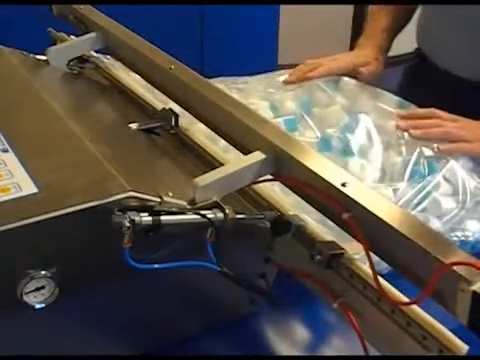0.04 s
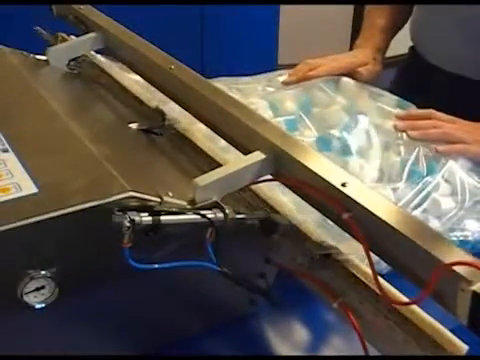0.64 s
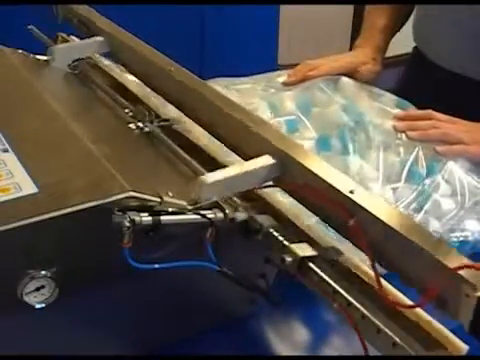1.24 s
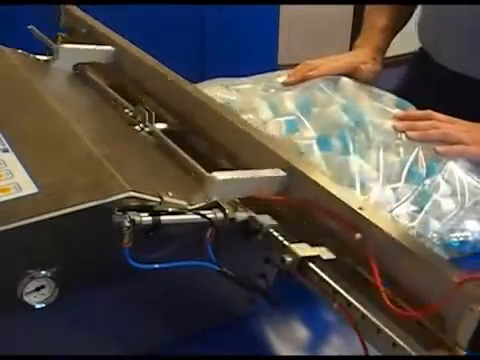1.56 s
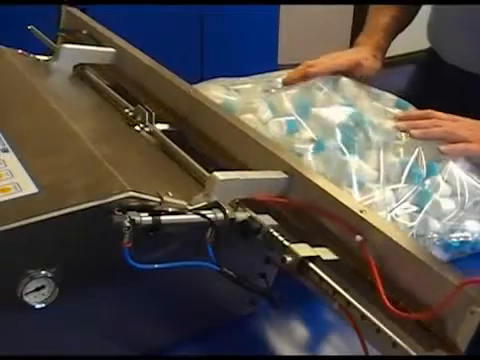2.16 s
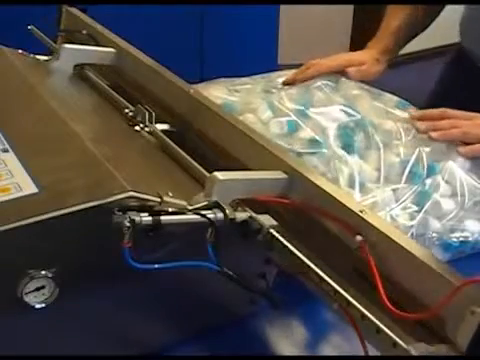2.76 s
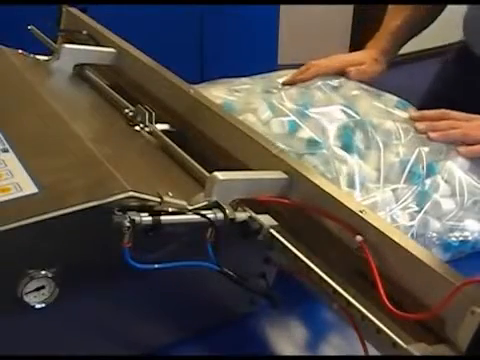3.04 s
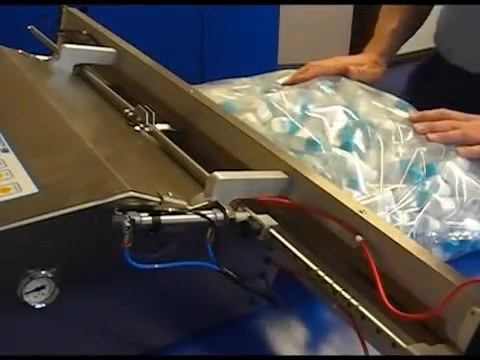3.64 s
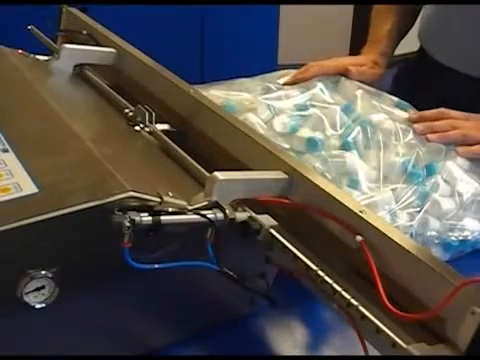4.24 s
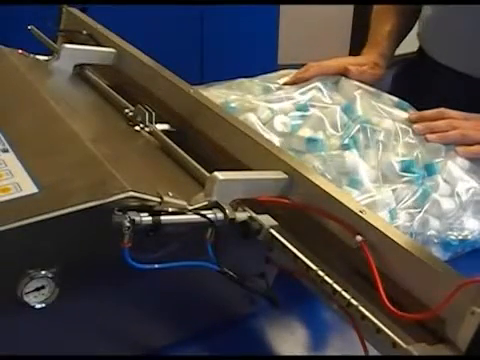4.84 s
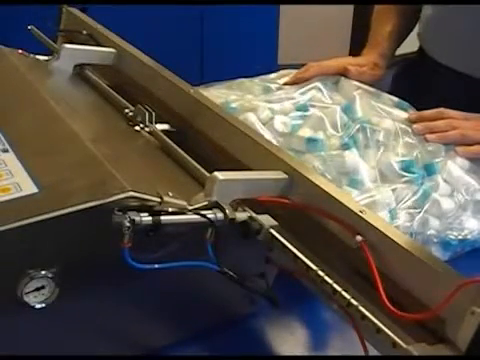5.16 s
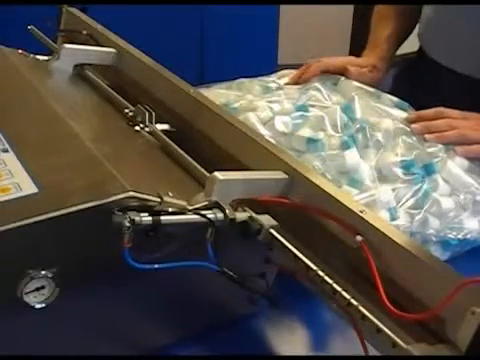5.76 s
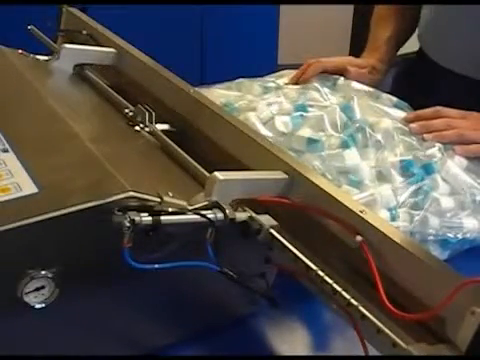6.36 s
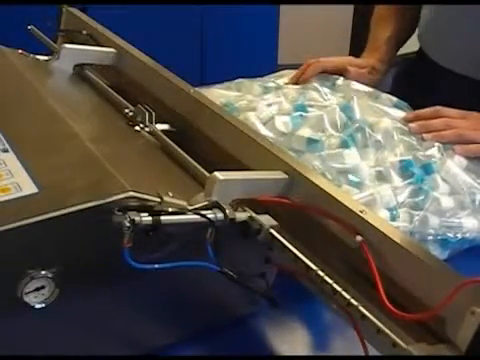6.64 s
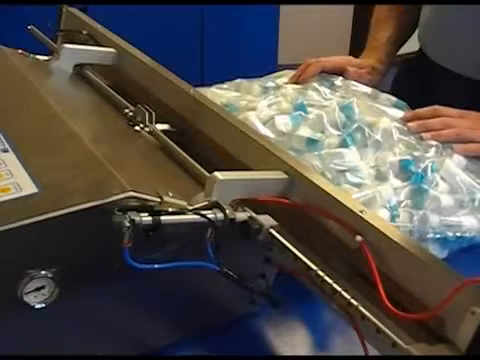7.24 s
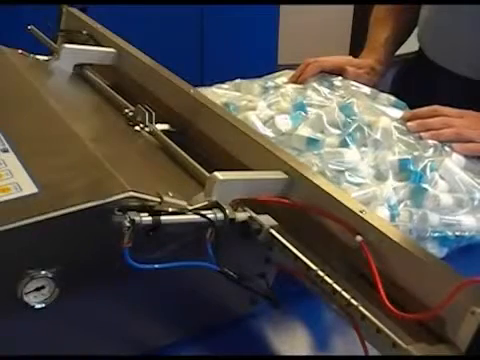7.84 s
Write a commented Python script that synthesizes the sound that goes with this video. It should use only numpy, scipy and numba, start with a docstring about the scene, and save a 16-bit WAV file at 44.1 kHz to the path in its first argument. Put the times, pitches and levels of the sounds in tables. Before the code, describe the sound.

Metal clacks and a short pneumatic hiss give way to a vacuum sealer's loud, even suction, interrupted once by a sharp valve click.

```python
"""A pneumatic vacuum sealer in a quiet workshop. Plastic film ticks, a port starts to leak, a latch snaps.
The carriage rumbles and the jaw drops on the bag, exciting the modes of the steel frame; a cylinder
exhausts with a hiss and thin whistles. At 1.9 s a valve opens and turbulent suction rushes steadily
through the resonant steel housing. A second later the valve snaps over; near 4.7 s a low hum swells and
fades. Throughout, a limiter ducks after the sharpest clacks and creeps back."""
import sys
import numpy as np
from scipy import signal
from scipy.fft import rfft, irfft, next_fast_len
from scipy.io import wavfile
from scipy.ndimage import uniform_filter1d, map_coordinates
from numba import njit

SR = 44100
rng = np.random.default_rng(int(sys.argv[2]) if len(sys.argv) > 2 else 0)


def generate_wav(sig):
    """Save sig (samples, or channels by samples) to the path in sys.argv[1] as 16-bit PCM at SR."""
    pcm = np.round(np.clip(np.atleast_2d(sig).T, -1, 1) * 32767).astype(np.int16)
    wavfile.write(sys.argv[1], SR, pcm)


N = 347949
T = np.arange(N) / SR

# background spectrum of the workshop: (frequency [Hz], level [dB])
WORKSHOP_SPECTRUM = [(25, -1), (60, 1), (100, 0), (200, 0.5), (300, -2.5), (400, -4), (500, -11),
                     (1000, -11), (1500, -20), (4000, -19), (15000, -29)]
# ticks of film and guides: (time [s], level [dB], centre [Hz], sharpness [Q], cover's relative level [dB])
FILM_TICKS = [(0.008, -53.5, 1060, 2.2, -17), (0.0607, -50.5, 2200, .9, -12),
              (0.075, -63.5, 4600, 1.2, -17), (0.7435, -47.5, 1000, 2.4, -19), (0.743, -52, 5460, 3.1, -21),
              (0.743, -55, 2700, 2.4, -17), (0.918, -49, 2096, 0.38, -16), (1.0075, -49.5, 5700, 1, -22),
              (1.473, -58, 2200, .6, -17), (1.620, -55, 1200, 2, -13), (1.658, -56, 2700, 4, -22),
              (1.697, -47.5, 5334, 1.5, -15.5), (1.742, -59, 4400, 0.96, -16), (1.750, -46, 4600, 4, -24),
              (1.767, -49, 2600, 1.2, -17), (2.779, -36.8, 5600, 0.6, -11), (5.087, -47.5, 5300, 1.8, -21)]
# ringing guide, frame, clamp, jaw and end stop: (time [s], frequency [Hz], level [dB], t60 [s], drive [s])
STEEL_RINGS = [(0.056, 1017, -68.5, 0.27, .001), (.182, 398, -50, .19, 0.0051),
               (0.158, 250, -37, .026, .003), (1.042, 1880, -59, .08, .002),
               (1.042, 410, -41.5, 0.065, 0.005), (1.134, 1725, -39.5, 0.032, .007),
               (1.138, 2880, -48, .064, .001), (1.134, 675, -46, 0.15, .004),
               (1.134, 535, -51, 0.097, .004), (1.898, 410, -39, 0.085, 0.02),
               (1.897, 303, -44, 0.16, 0.003)]
# spectrum of air forced through a narrow port: (frequency [Hz], level [dB])
HISS_SPECTRUM = [(300, -3), (1000, -8), (1600, 1.5), (2600, 1), (3900, -4), (5400, 2.5), (7400, 0),
                 (9000, -9), (11500, -12), (15000, -19)]
# resonances of the port that leaks while the jaw closes: (frequency [Hz], width [Hz], gain [dB])
LEAK_RESONANCES = [(2320, 190, 11), (4860, 470, 8.5), (5600, 280, 9.5), (6700, 500, -3), (1100, 700, -2),
                   (7500, 650, 6.5)]
# metal striking metal: (time [s], level [dB], tilt [dB/octave], contact time [s], t60 [s])
METAL_CLACKS = [(0.1562, -42, 1.9, 0.009, 0.052), (1.041, -60, -10, .004, .07),
                (1.116, -54, -7, 0.008, 0.04), (1.124, -53, 0, 0.01, 0.05),
                (1.134, -45.5, -3, 0.011, 0.075), (1.889, -53, -0.5, 0.011, 0.049),
                (1.899, -44.5, -2, 0.0039, 0.092), (2.8925, -26.3, -0.9, 0.0019, 0.034)]
# spectrum of a clack before its tilt: (frequency [Hz], level [dB])
CLACK_SPECTRUM = [(60, -45), (200, -25), (550, 1), (1100, -0.5), (2800, -2.5), (4000, -10), (5800, -.5),
                  (10000, -4.5), (12000, -6), (15000, -20.5)]
# mode clusters of the latch spring: (centre [Hz], sharpness [Q], level [dB], t60 [s])
SPRING_CLUSTERS = [(6480, 24, -33.5, .025), (6430, 38, -52, .28), (6050, 7, -61, .22)]
# blows on the steel frame: (time [s], level [dB], spectral centre [Hz], decay time scale [ratio])
FRAME_BLOWS = [(0.181, -52, 190, 0.55), (0.619, -72, 620, 1.4), (1.041, -49, 400, 1.1),
               (1.060, -50.5, 115, 1.6), (1.133, -42.3, 165, 0.75), (1.575, -69, 200, .6),
               (1.783, -57.5, 210, 0.58), (1.828, -61, 190, 0.5), (1.897, -41.5, 560, 0.25),
               (2.801, -63, 85, 1.3), (2.901, -43, 520, 0.6), (2.941, -53, 85, 0.61)]
# modes of the frame, before a blow weights and scales them: (frequency [Hz], level [dB], t60 [s])
FRAME_MODES = [(93.5, -13, 0.58), (140, -12, .4), (181, -1.5, 0.22), (196, 1, 0.31), (262.7, -2, .28),
               (315.6, -1, 0.33), (401.6, -3.5, 0.39), (550, -22, 0.18), (682, -9, 0.21), (994, 3, 0.11)]
# strokes of the carriage: (start [s], duration [s], level [dB])
CARRIAGE_STROKES = [(0.5, 0.55, -83), (1.094, 0.085, -59), (1.557, 0.43, -71)]
# spectrum of the moving carriage: (frequency [Hz], level [dB])
RUMBLE_SPECTRUM = [(40, -31), (90, 2), (170, 2), (280, -22), (400, -1.5), (520, -31), (1200, -20),
                   (3000, -36)]
# resonances of the cylinder's exhaust port: (frequency [Hz], width [Hz], gain [dB])
EXHAUST_RESONANCES = [(1720, 55, 7), (1980, 55, 11), (2120, 50, 5), (2280, 150, -7), (2450, 70, 6),
                      (2680, 90, 10), (3180, 110, 11), (4290, 90, 7), (4530, 110, 9), (4930, 100, 10.5),
                      (5420, 240, 7.5), (5750, 120, -1), (6020, 130, 3), (6250, 150, -3), (6560, 110, 5),
                      (6900, 110, 4), (7130, 140, 5), (7640, 130, 6), (8700, 200, 3), (10100, 300, 4),
                      (10800, 300, 4)]
# whistles of the exhaust: (start [s], stop [s], starting pitch [Hz], level [dB])
EXHAUST_WHISTLES = [(1.176, 1.417, 5730, -72), (1.211, 1.45, 6630, -74), (1.461, 1.69, 5380, -69.5)]
# spectrum of the suction jet: (frequency [Hz], level [dB])
JET_SPECTRUM = [(50, -42), (90, -29), (140, -20.6), (270, -9.6), (520, -9), (820, -.6), (1170, -.5),
                (1350, -6), (1850, -8.3), (2700, -3.4), (3750, -20.7), (6500, -23.6), (10500, -26.3),
                (15000, -32)]
# resonances and antiresonances of the housing: (frequency [Hz], width [Hz], gain [dB])
HOUSING_RESONANCES = [(208, 14, 2), (233, 16, -4.5), (302, 17, 5.5), (377, 21, -3.5), (406, 40, 5.3),
                      (538, 16, 3), (613, 30, 3.5), (681, 15, 3.5), (711, 19, -4.5), (752, 25, -9.5),
                      (946, 20, 3), (1014, 34, -3.5), (1070, 27, 7.5), (1107, 10, -3), (1168, 14, -3),
                      (1204, 46, 4.5), (1231, 22, 8.2), (1316, 26, -3), (1391, 30, -3), (1434, 30, 6.8),
                      (1489, 16, -5), (1572, 30, 6.2), (1618, 18, -6.5), (1655, 36, 5.5), (1715, 30, -3),
                      (1995, 70, 4), (2057, 21, -2.5), (2180, 58, -4.5), (2238, 30, 5.3), (2291, 24, -5.5),
                      (2385, 30, 1.5), (2606, 50, -5), (2720, 90, .7), (2809, 34, -3.5), (2904, 38, -4.5),
                      (2963, 76, -5), (3171, 30, 3.8), (3389, 36, 4), (4375, 70, 5.3), (5110, 180, 5.3),
                      (5470, 120, 2.2), (6000, 140, 2), (7710, 160, 2.5), (8230, 180, 2.5),
                      (8700, 150, 2.2), (10130, 140, 3), (10770, 400, 2.5), (12100, 900, -2.6)]
# modes of the suction valve's body: (frequency [Hz], level [dB], t60 [s])
VALVE_MODES = [(1420, -32, .08), (2240, -23, .04), (3050, -27, .025), (4390, -39, .075), (5080, -35, .03),
               (7300, -31, .03), (9020, -37, .03), (10000, -38, .04)]


def undb(db):
    """Amplitude ratio of a level in decibels."""
    return 10 ** (np.asarray(db) / 20)


def colour(points, hz):
    """Spectral envelope in dB, interpolated over log frequency."""
    point_hz, db = np.transpose(points)
    return np.interp(np.log(hz), np.log(point_hz), db)


def bandpass(hz, centre_hz, q):
    """Response in dB of a second-order resonator; doubling it gives two in cascade."""
    return -10 * np.log10(1 + (q * (hz / centre_hz - centre_hz / hz)) ** 2)


def resonances(modes, hz):
    """Response in dB of a set of Lorentzian peaks and notches."""
    return sum(db / (1 + (2 * (hz - centre) / width) ** 2) for centre, width, db in modes)


def ripple(hz, depth_db):
    """Modal overlap: crowded upper modes make the treble response irregular, in dB."""
    modes_hz = np.arange(3300, SR / 2, 55)
    return depth_db * np.interp(hz, modes_hz, rng.standard_normal(len(modes_hz)), left=0)


def noise(db_at, size=N):
    """Spectral shaping: Gaussian noise of rms 1, weighted by db_at(frequency)."""
    n = next_fast_len(size)
    hz = np.maximum(np.fft.rfftfreq(n, 1 / SR), 1)
    spectrum = rfft(rng.standard_normal(n)) * undb(db_at(hz))
    x = irfft(spectrum, n)[:size]
    return x / np.sqrt(np.mean(x ** 2))


def burst(db_at, gain):
    """Transient noise whose energy is set by its envelope alone."""
    x = noise(db_at, len(gain)) * gain
    return x * np.linalg.norm(gain) / np.linalg.norm(x)


def fade(t, t60):
    """Exponential damping from t = 0 on, 60 dB in t60 seconds; unity before."""
    return np.exp(-np.log(1000) * np.maximum(t, 0) / t60)


def struck(t, drive_s, t60):
    """Driven, then free vibration: energy grows linearly during the drive and decays after it."""
    return np.minimum(t / drive_s, 1) ** 0.5 * fade(t - drive_s, t60)


def envelope(start, attack, stop, t60):
    """Linear onset, steady state until stop, then exponential decay; all in seconds."""
    return np.clip((T - start) / attack, 0, 1) * fade(T - stop, t60)


def ring(modes, t):
    """Modal superposition: a struck body vibrates as a sum of damped sines."""
    return sum(undb(db) * np.sin(2 * np.pi * hz * t) * fade(t, t60) for hz, db, t60 in modes)


def bend(x, pitch):
    """Resampling at a varying rate scales every frequency by the ratio pitch."""
    return map_coordinates(x, [np.cumsum(pitch)], order=3, mode="mirror")


def add(out, start, x):
    """Superpose x on out from start seconds."""
    i = int(start * SR)
    out[i:i + len(x)] += x[:N - i]


def film_ticks():
    """Impulse excitation: film and guides snap, and the sheet-metal cover answers with a hollow tail."""
    out, t = np.zeros(N), T[:SR // 5]
    for start, db, centre_hz, q, cover_db in FILM_TICKS:
        snap = burst(lambda hz: 2 * bandpass(hz, centre_hz, q), fade(t, t60=0.011))
        cover = noise(lambda hz: bandpass(hz, 920, 1.3) + bandpass(hz, 560, 0.6), len(t))
        add(out, start, undb(db) * (snap + undb(cover_db) * cover * fade(t, t60=0.16)))
    return out


def steel_rings():
    """Resonance: struck steel parts swell while driven, then ring at their natural frequencies."""
    out, t = np.zeros(N), T[:SR // 2]
    for start, hz, db, t60, drive_s in STEEL_RINGS:
        add(out, start, undb(db) * struck(t, drive_s, t60) * np.sin(2 * np.pi * hz * t))
    return out


def leak():
    """Turbulence in a resonant port grows as pressure builds behind it and dies once the jaw is down."""
    hiss = noise(lambda hz: colour(HISS_SPECTRUM, hz) + resonances(LEAK_RESONANCES, hz))
    return undb(-73) * hiss * envelope(start=0.1, attack=0.62, stop=1.12, t60=3.6)


def clacks():
    """Contact noise: metal parts chatter over a broad band while they touch, then die away quickly."""
    out, t = np.zeros(N), T[:SR // 2]
    for start, db, tilt_db, contact_s, t60 in METAL_CLACKS:
        chatter = burst(lambda hz: colour(CLACK_SPECTRUM, hz) + tilt_db * np.log2(np.maximum(hz, 200)),
                        fade(t - contact_s, t60))
        add(out, start, undb(db) * chatter)
    return out


def latch_spring():
    """Beating: the spring's closely spaced modes zing as narrow bands of noise."""
    out, t = np.zeros(N), T[:SR // 2]
    for centre_hz, q, db, t60 in SPRING_CLUSTERS:
        cluster = noise(lambda hz: 2 * bandpass(hz, centre_hz, q), len(t))
        add(out, start=0.162, x=undb(db) * struck(t, drive_s=0.005, t60=t60) * cluster)
    return out


def frame_knocks():
    """Modal excitation: each blow rings the frame and panels with its own spectral centre and level."""
    out, t = np.zeros(N), T[:SR // 2]
    for start, db, centre_hz, decay_scale in FRAME_BLOWS:
        modes = [(hz, mode_db + bandpass(hz, centre_hz, 1), t60 * decay_scale)
                 for hz, mode_db, t60 in FRAME_MODES]
        panels = noise(lambda hz: 2 * bandpass(hz, centre_hz, 0.49) + bandpass(hz, 240, 0.48), len(t))
        panels *= undb(5) * fade(t, 0.1 * decay_scale)
        blow = (ring(modes, t) + panels) * (1 - np.exp(-t / 0.0028))
        add(out, start, undb(db) * blow / np.std(blow[:SR // 50]))  # the first 20 ms set the level
    return out


def carriage():
    """Structure-borne noise: the carriage rumbles while it moves."""
    travel = sum(undb(db) * envelope(start, attack=0.017, stop=start + duration, t60=1)
                 for start, duration, db in CARRIAGE_STROKES)
    return travel * noise(lambda hz: colour(RUMBLE_SPECTRUM, hz))


def exhaust():
    """Discharge through a resonant port: a hiss starts as the jaw lands, weakens as the cylinder empties."""
    start, sag_db_per_s = 1.125, 2.5
    hiss = noise(lambda hz: colour(HISS_SPECTRUM, hz) + resonances(EXHAUST_RESONANCES, hz) + ripple(hz, 2))
    pitch = 1 + 0.006 * noise(lambda hz: 2 * bandpass(hz, 6, 0.7))  # wanders with the pressure
    level = undb(-65 - sag_db_per_s * (T - start))
    return level * bend(hiss, pitch) * envelope(start, attack=0.033, stop=1.78, t60=1)


def whistles():
    """Cavity resonance: breathy whistles catch, climb as the chamber shortens and break off."""
    out, rise_per_s = np.zeros(N), 0.078
    for start, stop, start_hz, db in EXHAUST_WHISTLES:
        band = noise(lambda hz: 2 * bandpass(hz, start_hz, q=38))
        waver = 0.007 * noise(lambda hz: 2 * bandpass(hz, 25, 0.5))
        pitch = 1 + rise_per_s * np.clip(T - start, 0, stop - start) + waver
        out += undb(db) * bend(band, pitch) * envelope(start, attack=0.02, stop=stop, t60=0.15)
    return out


def suction():
    """Source and filter: the housing colours a turbulent jet that rises as its valve opens, then holds."""
    start, opening_s, sag_db_per_s = 1.897, 0.014, 0.0077
    jet = noise(lambda hz: colour(JET_SPECTRUM, hz) + resonances(HOUSING_RESONANCES, hz) + ripple(hz, 1.1))
    flutter_db = 0.18 * noise(lambda hz: 2 * bandpass(hz, 23, 0.38))
    opening = np.clip((T - start) / opening_s, 0, 1)
    return jet * opening * undb(-43.3 - sag_db_per_s * (T - start) + flutter_db)


def valve_snap():
    """Free vibration: the suction valve snaps over and its body rings."""
    out, t = np.zeros(N), T[:SR // 2]
    add(out, start=2.8927, x=ring(VALVE_MODES, t) * (1 - np.exp(-t / 0.0006)))
    return out


def hum():
    """Amplitude modulation: a low pure tone swells once beneath the suction and fades."""
    hz, peak_s, width_s = 71.5, 4.69, 0.5
    swell = undb(-74.5) / (1 + (2 * (T - peak_s) / width_s) ** 2)
    return np.sqrt(2) * np.sin(2 * np.pi * hz * T) * swell


def room(x, wet_db, t60_low, t60_high):
    """Reverberation: diffuse reflections build up quickly; bass and treble decay at their own rates."""
    t = T[:SR // 2]
    white = rng.standard_normal(len(t))
    low = signal.sosfilt(signal.butter(2, 1500, fs=SR, output="sos"), white)
    tail = low * fade(t, t60_low) + (white - low) * fade(t, t60_high)
    tail *= 1 - np.exp(-t / 0.00044)
    return x + undb(wet_db) * signal.fftconvolve(x, tail / np.linalg.norm(tail))[:N]


@njit
def ducking(over_db, hold_s, release_s):
    """Peak hold: gain reduction in dB jumps to each overshoot, holds, then relaxes exponentially."""
    out, cut, wait = np.empty(len(over_db)), 0., 0.
    for i in range(len(over_db)):
        wait -= 1 / SR
        if over_db[i] > cut:
            cut, wait = over_db[i], hold_s
        elif wait < 0:
            cut -= cut / (release_s * SR)
        out[i] = cut
    return out


def scene():
    """Superposition of the workshop's background, reverberant impacts and the sustained machine sounds."""
    background = undb(-78.5) * noise(lambda hz: colour(WORKSHOP_SPECTRUM, hz))
    impacts = film_ticks() + steel_rings() + clacks() + latch_spring() + frame_knocks() + valve_snap()
    impacts = room(impacts, wet_db=-12.5, t60_low=0.43, t60_high=0.31)
    sustained = leak() + carriage() + exhaust() + whistles() + suction() + hum()
    return (background + impacts + sustained)[None]


def record(dry):
    """Limiting with slow recovery; spikes that outrun it are clipped; deep bass and top treble are cut."""
    ceiling_db, clip_level = -33, undb(-25.5)
    power = np.abs(uniform_filter1d(dry[0] ** 2, size=96))
    over_db = 10 * np.log10(power + 1e-18) - ceiling_db
    limited = dry * undb(-ducking(over_db, hold_s=0.09, release_s=0.12))
    clipped = np.clip(limited, -clip_level, clip_level)
    bass_cut = signal.sosfilt(signal.butter(2, 72, "high", fs=SR, output="sos"), clipped)
    return signal.sosfilt(signal.ellip(10, 0.2, 70, 15050, fs=SR, output="sos"), bass_cut)


dry = scene()
out = record(dry)
generate_wav(out)
```